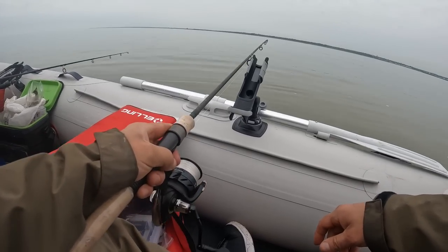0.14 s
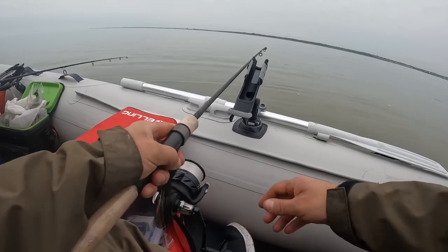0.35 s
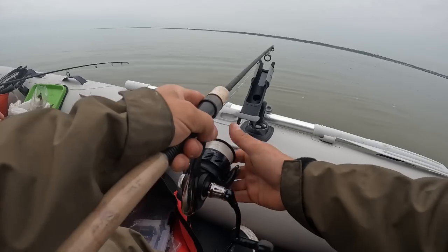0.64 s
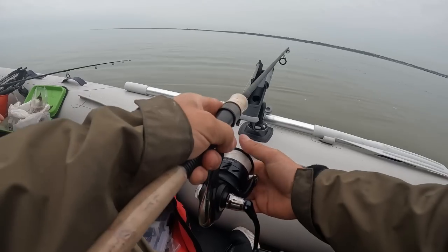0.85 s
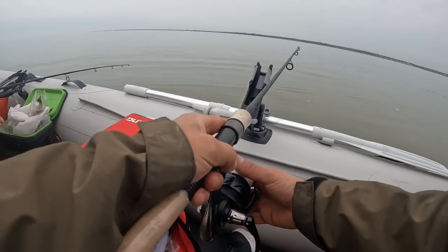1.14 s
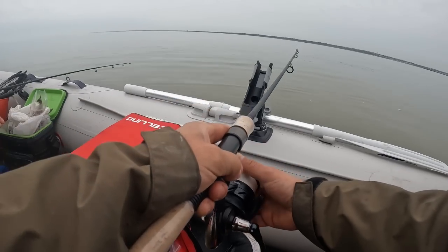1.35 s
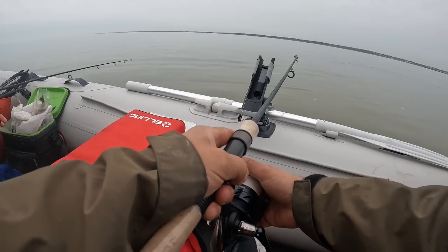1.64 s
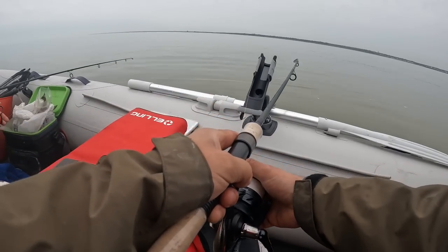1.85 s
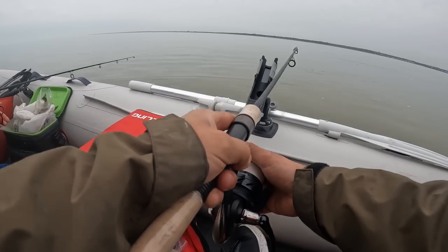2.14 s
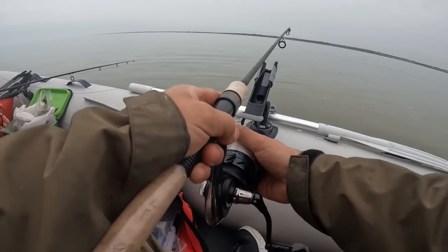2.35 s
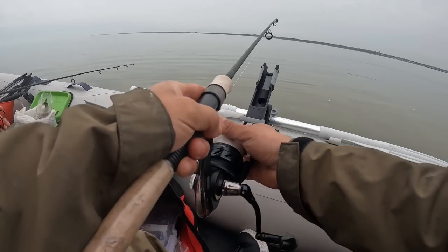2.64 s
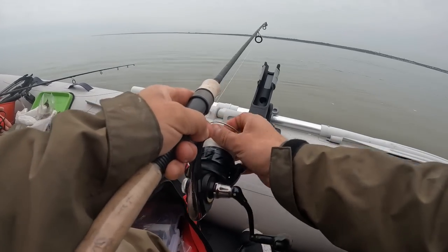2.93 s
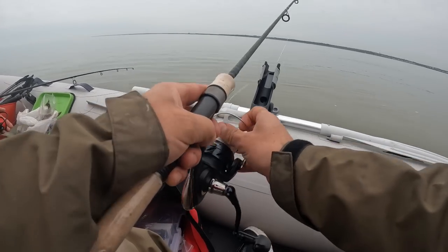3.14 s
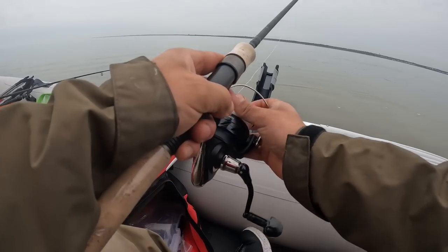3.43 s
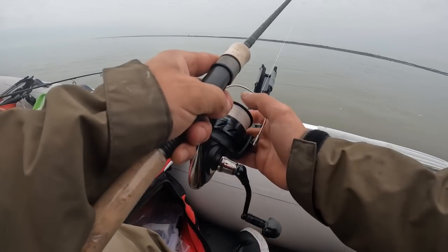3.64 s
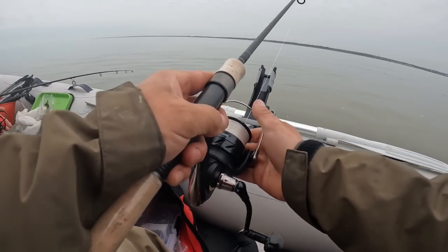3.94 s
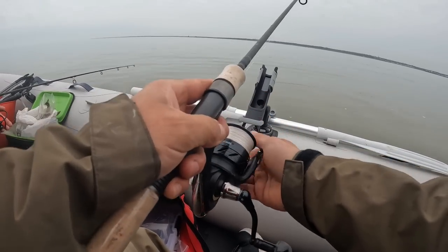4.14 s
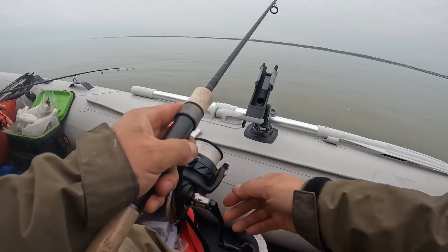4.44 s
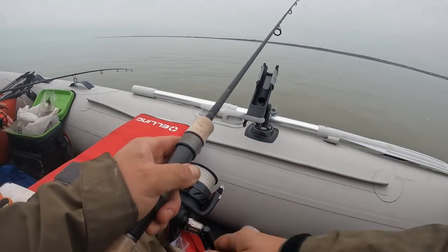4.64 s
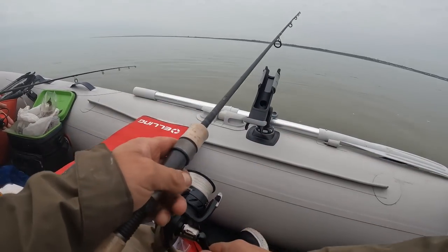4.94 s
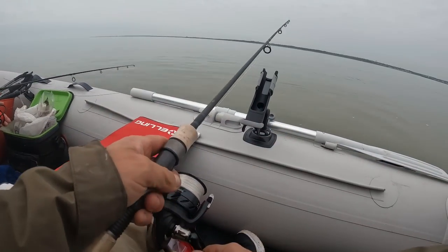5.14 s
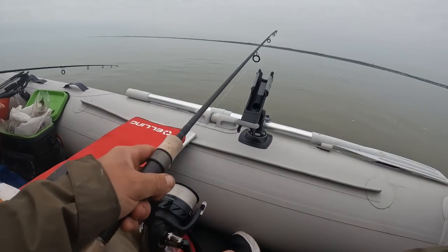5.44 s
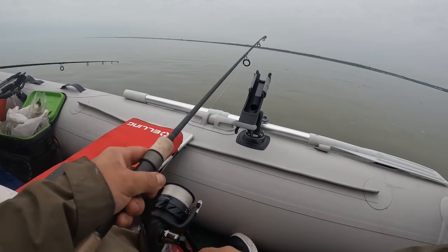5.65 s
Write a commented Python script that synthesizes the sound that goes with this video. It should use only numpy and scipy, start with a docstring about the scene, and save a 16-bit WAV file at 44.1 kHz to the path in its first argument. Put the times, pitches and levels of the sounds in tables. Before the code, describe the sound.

In the open air on an inflatable boat, wavelets thump hollowly on the hull over a steady low rumble. Within arm's reach of the microphone, a sleeve swishes, then a spinning reel gives sharp, briefly ringing knocks on its rod. A quick run of dry line ticks leads to a single bright snap of the bail arm. Sleeves rub again as a louder wavelet booms against the boat.

```python
"""Sharp knocks, dry ticks and a metallic snap sound up close, among swishing sleeves and hollow thumps.
An angler handles a rod and spinning reel in a small inflatable boat, near a body-worn camera.
The reel knocks and rings the rod, line ticks off the spool, and the bail arm chatters on its stop.
Jacket cloth rubs, wavelets set the hull booming, and a low rumble lies over the water."""
import sys
import numpy as np
from scipy.fft import rfft, irfft, next_fast_len
from scipy.io import wavfile
from scipy.ndimage import map_coordinates

SR = 44100
rng = np.random.default_rng(int(sys.argv[2]) if len(sys.argv) > 2 else 0)


def store_wav(level_fs):
    """Save 16-bit WAV to argv[1]."""
    pcm = np.round(np.clip(np.atleast_2d(level_fs), -1, 1) * 32767)
    wavfile.write(sys.argv[1], SR, pcm.T.astype(np.int16))


N = 256017
T = np.arange(SR // 2) / SR  # seconds within one hit

# The loose reel knocks on the rod. Each row: start in seconds, level in dB, thud offset in dB.
KNOCKS = [(1.556, -44.5, 9), (1.581, -41, 1.5), (1.685, -30.5, 1.5), (1.786, -46, 15), (1.942, -24.5, -1.5),
          (1.963, -46, -11), (2.394, -18, -3.5), (2.399, -30, 5), (2.43, -29.5, 1), (2.451, -20.5, -3),
          (2.4575, -15, -.5), (2.924, -17.5, -4), (3.066, -20, 0), (3.094, -23, -0.5), (3.106, -30.5, 2),
          (3.158, -26.5, 4)]
# Tone of sliding cloth. Each row: frequency in Hz, gain in dB.
SWISH_COLOUR = [(300, 2), (800, -11.5), (1400, 2), (2600, -3), (3600, 0.5), (5200, -1), (7200, -1),
                (8300, -8.5), (10500, -10.5), (12500, -15), (14500, -25.5), (16000, -48)]
# Dull tone of the hand on the grip. Each row: frequency in Hz, gain in dB.
PALM_COLOUR = [(40, -30), (160, 0), (330, 3.5), (520, -0.5), (800, -6.5), (1100, -5.5), (2200, -27),
               (5000, -42), (12000, -60)]
# Contour of the hiss and the sleeves' small stirrings. Each row: time in seconds, level in dB.
HISS_LEVEL = [(0, -57), (.2, -59.5), (1.3, -59.5), (2.04, -66), (2.22, -58), (3.6, -57.5), (3.85, -60),
              (4.2, -53), (4.33, -61.5), (5.8, -56)]
# How alike left and right sound. Each row: frequency in Hz, correlation from 0 to 1.
STEREO_LIKENESS = [(100, 1), (300, 0.97), (600, 0.64), (1200, 0.87), (2600, 0.55), (4500, 0.8),
                   (8000, 0.81), (12000, 0.41)]


def reel_knocks():
    """Each knock cracks, rings the rod and thuds in grip and palm; the shifting hand detunes the modes."""
    # Modes of the rod and of its grip. Each row: frequency in Hz, level in dB, t60 in seconds.
    rod_modes = [(902, -23.5, 0.16), (1134.4, -1, 0.1), (1218, -7, 0.078), (1343, -9, 0.054),
                 (1580, -17, 0.057), (1840, -14, 0.08), (2100, -8, 0.019), (2800, -2.5, 0.04),
                 (2980, 5, 0.012), (3460, -10, 0.033), (4090, -14, 0.033), (4490, -8.5, 0.031),
                 (4960, -13, 0.019)]
    grip_modes = [(62.6, -7, 0.21), (104, -4, 0.081), (171, -0.5, 0.064), (217.5, 3.5, 0.073),
                  (285, -2.5, 0.084), (415.6, -9.5, 0.12), (520, -6.5, 0.065)]
    # Tone of the contact crack. Each row: frequency in Hz, gain in dB.
    crack_colour = [(200, 10), (800, -1), (1300, 10), (3200, 5), (5800, -1.5), (7500, -8), (11000, -15),
                    (15500, -36)]
    hard_knock_db = -16.5
    out = np.zeros((2, N))
    for start, db, thud_db in KNOCKS:
        force_db = db - hard_knock_db
        brightness_db = .075 * force_db - .5  # light knocks are duller
        rod = ring(rod_modes, rise=.0004, scatter_db=1.5, tilt_db=brightness_db, detune=.005)
        crack = burst(crack_colour, t60=.061)
        grip = ring(grip_modes, rise=.0053, scatter_db=1.5, detune=.016)
        palm = burst(PALM_COLOUR, t60=.063)
        add(out, start, amp(db - .5) * rod + amp(-25 + .47 * force_db) * crack)
        add(out, start, amp(db + thud_db) * (amp(3) * grip + amp(-6.5) * palm))
    return out


def bail_snap():
    """The sprung wire chatters on its stop, to the right; the rod sings on after it."""
    # The bail arm strikes and bounces. Each row: start in seconds, level in dB.
    strikes = [(4.1985, -14.5), (4.2023, -19.5), (4.2057, -17.5), (4.2115, -18.5)]
    # Modes of the steel wire. Each row: frequency in Hz, level in dB, t60 in seconds.
    wire_modes = [(1330, -19, .045), (1740, -5, .035), (2230, 3.5, 0.023), (2460, -3.5, 0.021),
                  (3340, -15, 0.02), (3730, 7.5, 0.024), (4180, 2, 0.033), (5510, 0, .02), (6100, 2, .02),
                  (7040, 5, .02), (10200, -30, 0.047)]
    # Tone of the snap. Each row: frequency in Hz, gain in dB.
    snap_colour = [(300, -2), (800, -12), (1300, 0), (2200, 7), (7300, -5), (8300, -12), (11000, -6),
                   (14000, -24), (15700, -34)]
    finger_slide = swell(strikes[0][0] - .0065, half_length=.023)  # fingers scrape the wire first
    out = amp(-47) * finger_slide * noise(SWISH_COLOUR)
    for start, db in strikes:
        wire = ring(wire_modes, rise=.0001, scatter_db=2, detune=.015) * amp([[-2.3], [2.3]])
        crack = burst(snap_colour, t60=.016) * amp([[-.8], [.8]])
        add(out, start, amp(db - 3.5) * wire + amp(db - 2.5) * crack)
    add(out, 4.213, amp(-32.5) * burst(snap_colour, t60=.18))  # bright tail
    rod_song = ring([(1145, -1, .2), (1325, 7, .083), (10100, -23, .5)], rise=.0025, scatter_db=-1)
    late_song = ring([(1140, -1, .092), (1263, -11, .076)], rise=.014, scatter_db=3)
    add(out, 4.202, amp(-29.5) * rod_song)
    add(out, 4.232, amp(-25.5) * late_song)
    return out


def line_ticks():
    """Line slips off the spool's lip in dry ticks."""
    # Line and fingernails on the spool. Each row: start in seconds, level in dB, centre in Hz.
    ticks = [(1.2363, -37, 1800), (2.192, -35, 3570), (3.08, -17.5, 3680), (3.128, -23, 2400),
             (3.193, -21.5, 3500), (3.218, -23.5, 3800), (3.238, -29, 1800), (3.251, -21, 3000),
             (3.274, -22.5, 3800), (3.3226, -23.5, 2580), (3.3563, -29.5, 5510), (3.406, -31.5, 4500),
             (3.454, -33, 2500), (3.644, -30, 1670), (5.473, -28.5, 1460)]
    out = np.zeros((2, N))
    for start, db, hz in ticks:
        colour = [(hz / 5, -18), (hz * .65, -1), (hz, 0), (hz * 1.78, -6), (12000, -23), (15500, -42)]
        add(out, start, amp(db - 5) * burst(colour, t60=.021))
    return out


def hand_taps():
    """The hand lands on the grip in short, dull taps."""
    # Taps on the grip. Each row: start in seconds, level in dB.
    taps = [(1.236, -38), (1.509, -36), (2.164, -41), (3.158, -30), (3.645, -36.5), (4.450, -27.5),
            (4.895, -29.5), (5.476, -39)]
    out = np.zeros((2, N))
    for start, db in taps:
        add(out, start, amp(db - 3) * burst(PALM_COLOUR, t60=.046))
    return out


def jacket():
    """Sleeves swish; pressed cloth adds a hollow rub and a low drag."""
    # Tone of dragging cloth. Each row: frequency in Hz, gain in dB.
    drag_colour = [(30, 2), (100, -4.5), (250, -10.5), (450, -1.5), (750, -4), (1100, -5), (2000, -41)]
    # Pan of the moving sleeve. Each row: time in seconds, left minus right in dB.
    sleeve_pan = [(.45, -1.5), (.6, -1), (.76, 4.5), (.95, 4.5), (3.2, 2), (5.2, -0.5), (5.55, 2.5)]
    swish_gain, rub_gain, drag_gain = arm_movements()
    swish = amp(.97) * swish_gain * friction(SWISH_COLOUR, slips_per_s=700, grain=.45, flutter_db=1.34)
    rub = rub_gain * amp(1.3 * wobble(70)) * hollow_folds()
    drag = amp(-2) * drag_gain * friction(drag_colour, slips_per_s=350, grain=.28, flutter_db=2.5)
    return (swish + rub) * amp(curve(sleeve_pan) * [[.5], [-.5]]) + drag


def arm_movements():
    """Envelopes of the cloth's swish, rub and drag; overlapping movements add in power."""
    # A cuff brushes past. Each row: fastest moment in seconds, swish in dB, half length in seconds.
    brushes = [(0.35, -53.5, 0.1), (0.792, -39, 0.054), (0.909, -48.5, 0.018), (1.026, -49, 0.054),
               (1.191, -50, 0.034), (1.386, -54.5, 0.013), (1.456, -54, 0.017), (1.548, -53.5, 0.03),
               (1.645, -57, 0.026), (1.864, -53.5, 0.027), (2.111, -56, 0.02), (2.321, -54, 0.053),
               (2.496, -48, 0.076), (2.693, -53, 0.05), (3.022, -50.5, 0.063), (3.101, -40.5, 0.027),
               (3.21, -41.5, 0.041), (3.289, -41.5, .027), (3.359, -47, 0.021), (3.431, -47.5, 0.028),
               (3.496, -45.5, 0.031), (3.563, -46, 0.02), (4.421, -51, 0.032), (5.353, -53.5, 0.091)]
    # An arm sweeps over the jacket. Each row: start, attack, hold and release (to -20 dB) in seconds,
    # then swish, rub and drag in dB.
    sweeps = [(0.358, 0.073, 0.12, 0.2861, -36.5, -37.5, -44), (3.05, 0.076, 0.12, 0.26, -51.5, -55, -52.5),
              (4.381, 0.29, 0.079, 0.5047, -42.5, -39, -49.5), (4.899, .13, 0.036, 0.14, -42.5, -40.5, -55),
              (5.098, 0.077, 0.062, 0.09, -49, -44.5, -56), (5.395, 0.11, 0.072, .2, -45.5, -55.5, -63),
              (5.548, 0.23, .1, .2, -46, -52.5, -50.5)]
    cuff_rub_db, cuff_drag_db = -10.5, -18.5
    fidget = amp(curve(HISS_LEVEL) - 4 + wobble(9))
    cuff_power = fidget ** 2 + sum((amp(db) * swell(s, half)) ** 2 for s, db, half in brushes)
    power = np.outer(amp([0, cuff_rub_db, cuff_drag_db]) ** 2, cuff_power)
    for start, attack, hold, release, *levels_db in sweeps:
        power += np.outer(amp(levels_db), sweep(start, attack, hold, release)) ** 2
    return np.sqrt(power)


def friction(colour, slips_per_s, grain, flutter_db):
    """Threads catch and slip: tiny clicks on a hiss, under uneven pressure."""
    slips = unit(rng.standard_normal(N) * (rng.random(N) < slips_per_s / SR))
    fibres = rng.standard_normal((2, N)) + grain * slips * [[1], [0]]  # clicks sit in the centre
    return coloured(fibres, colour) * amp(flutter_db * unit(wobble(45) + wobble(170)))


def hollow_folds():
    """The cloth's hollow ring: narrow bands of noise that rise as the folds close."""
    # Pitch of the folds. Each row: time in seconds, centre in Hz.
    fold_pitch = [(.4, 1294), (.8, 1383), (3.2, 1459), (4.55, 1704), (4.8, 1742), (5.05, 1567), (5.8, 1543)]
    # Modes of the folds. Each row: ratio to the centre, half width in Hz, level in dB.
    fold_modes = [(.8, 266, -6), (1, 387, 3.5), (1.42, 430, 1.5)]
    phase = 2 * np.pi * np.cumsum(curve(fold_pitch)) / SR
    bands = np.zeros((2, N))
    for ratio, width_hz, db in fold_modes:
        a, b = filtered(rng.standard_normal((2, 2, N)), lambda hz: 1 / (1 + (hz / width_hz) ** 2))
        bands += amp(db) * unit(a * np.cos(ratio * phase) + b * np.sin(ratio * phase))
    return coloured(bands, [(600, -14), (1000, 4.5), (2550, .5), (2900, -1)])


def hull_slaps():
    """Water slaps set the air tubes and the floor booming, with a dull slosh on top."""
    # Wavelets. Each row: start in seconds, level in dB, rise in seconds, tilt in dB per octave.
    slaps = [(.277, -20.5, 0.018, 2), (.785, -31.5, 0.017, 3), (.826, -27, 0.02, -7.5),
             (1.275, -31, 0.012, -4), (2.251, -31, 0.0032, -6.5), (3.375, -29.5, 0.0036, -5),
             (3.419, -26.5, 0.012, -4.5), (4.054, -29, 0.011, 0.5), (4.18, -30, 0.025, 4),
             (4.843, -33.5, .011, 10), (4.8949, -11.5, 0.0085, 2.5), (4.961, -22, 0.0069, -2.5)]
    # Modes of the hull. Each row: frequency in Hz, level in dB, t60 in seconds.
    hull_modes = [(99.1, 3, 0.3), (130, -1, 0.23), (148.6, 5, 0.19), (215.2, 0.5, 0.16),
                  (264.4, -2.5, 0.18), (363, -17, 0.083)]
    slosh_colour = [(150, -18), (280, 8), (400, 2.5), (700, -4.5), (1400, -6), (4000, -52)]
    out = np.zeros((2, N))
    for start, db, rise, tilt_db in slaps:
        boom = ring(hull_modes, rise, scatter_db=.8, tilt_db=tilt_db)
        slosh = burst(slosh_colour, t60=.2)
        add(out, start, amp(db + 10) * (boom + amp(-21.5) * slosh))
    return out


def camera_jolts():
    """Knocks jolt the camera, and it sways on its harness after a tug."""
    # The camera on its mount. Each row: frequency in Hz, level in dB, t60 in seconds.
    mount_mode = [(33, 0, 0.36)]
    out = np.zeros((2, N))
    for start, db, thud_db in KNOCKS:
        add(out, start, amp(db + thud_db - 4) * ring(mount_mode, rise=.0068, scatter_db=0))
    sway = ring([(27.3, 0, .79)], rise=.0063, scatter_db=0)
    add(out, 3.147, amp(-8) * sway)
    return out


def rumble():
    """A low drone swells and sinks over the water."""
    # Contour of the drone. Each row: time in seconds, level in dB.
    rumble_level = [(0.0, -44), (0.65, -40.5), (1.0, -43.5), (1.34, -42.5), (1.87, -46.5), (3.3, -41.5),
                    (3.6, -43.5), (5.81, -44)]
    # Its tone. Each row: frequency in Hz, gain in dB.
    rumble_colour = [(8, -36), (25, -2.5), (36, -5.5), (48, -9), (59, 3), (72, -12), (110, -14.5),
                     (200, -25), (330, -33), (700, -43.5), (2000, -89)]
    return amp(curve(rumble_level) + 3) * noise(rumble_colour)


def hiss():
    """A faint hiss lies under the handling."""
    # Tone of the hiss. Each row: frequency in Hz, gain in dB.
    hiss_colour = [(300, -16), (750, -24), (1000, 6.5), (1450, 9.5), (2400, 2), (3600, 1), (7200, -2),
                   (8300, -7), (11500, -8), (15500, -20)]
    return amp(curve(HISS_LEVEL) - 2.5) * noise(hiss_colour)


def ring(modes, rise, scatter_db, tilt_db=0, detune=0):
    """Damped modes, struck at scattered strengths; high ones reach left and right out of step."""
    hz, db, t60 = np.transpose(modes)[:, :, None]
    strength = amp(db + scatter_db * rng.standard_normal(hz.shape) + tilt_db * np.log2(hz / hz[0]))
    hz = hz * (1 + detune * rng.standard_normal(hz.shape))
    skew = rng.choice([-1, 1], hz.shape) * stereo_angle(hz)
    polarity = (-1) ** np.arange(len(hz))[:, None]
    waves = polarity * strength * amp(-60 * T / t60) * np.sin(2 * np.pi * hz * T + np.array([skew, -skew]))
    return unit_hit(waves.sum(axis=1) * (1 - np.exp(-T / rise)))


def burst(colour, t60):
    """The dying noise of one contact, which takes an instant to close."""
    closing = 1 - np.exp(-(T / .0005) ** 2)
    return unit_hit(noise(colour, len(T)) * closing * amp(-60 * T / t60))


def swell(peak_s, half_length):
    """A quick movement, fastest at peak_s."""
    return np.exp(-((np.arange(N) / SR - peak_s) / half_length) ** 2)


def sweep(start, attack, hold, release):
    """A long movement speeds up smoothly, holds, slows gently and then stops."""
    t = np.arange(N) / SR - start
    slowing = np.maximum(t - attack - hold, 0) / release
    return np.sin(np.pi / 2 * np.clip(t / attack, 0, 1)) ** 2 * amp(-20 * slowing ** 1.19)


def noise(colour, length=N):
    """Steady stereo noise of a given tone."""
    return coloured(rng.standard_normal((2, length)), colour)


def coloured(pair, colour):
    """Shape two unrelated signals into a left and right of rms 1, alike in the bass."""
    def response(hz):
        angle = stereo_angle(hz)
        return amp(along(colour, hz)) * [np.cos(angle), np.sin(angle)]
    mid, side = filtered(pair, response)
    return unit(np.array([mid + side, mid - side]))


def stereo_angle(hz):
    """Stereo spread in radians; 0 is mono."""
    return np.arccos(np.clip(along(STEREO_LIKENESS, hz), -1, 1)) / 2


def filtered(x, response):
    """Apply a frequency response."""
    n = x.shape[-1]
    padded = next_fast_len(n + 8192)
    return irfft(rfft(x, padded) * response(np.fft.rfftfreq(padded, 1 / SR)), padded)[..., :n]


def wobble(rate):
    """A smooth random curve, rate knots a second."""
    return map_coordinates(rng.standard_normal(int(N * rate / SR) + 4), [np.arange(N) * rate / SR])


def along(points, hz):
    """Read (Hz, value) points on a log axis."""
    knots_hz, values = np.transpose(points)
    return np.interp(np.log(hz + 1), np.log(knots_hz + 1), values)


def curve(rows):
    """Turn (seconds, value) rows into one value per sample."""
    return np.interp(np.arange(N) / SR, *np.transpose(rows))


def amp(db):
    """Decibels to gain."""
    return 10 ** (np.asarray(db) / 20)


def unit(x):
    """Scale to rms 1."""
    return x / np.sqrt(np.mean(x ** 2) + 1e-20)


def unit_hit(x):
    """Give a stereo hit the energy of one millisecond at rms 1."""
    return x / np.sqrt(np.sum(np.mean(x ** 2, axis=0)) / (SR * .001))


def add(track, start, sound):
    """Mix a hit in at start seconds."""
    part = track[:, round(start * SR):][:, :len(T)]
    part += sound[..., :part.shape[1]]


def scene():
    """Everything is within arm's reach, in open air, leaning a touch to the left."""
    cloth_and_hiss = jacket() + hiss()
    tackle = reel_knocks() + hand_taps() + line_ticks() + bail_snap()
    low_end = hull_slaps() + rumble() + camera_jolts()
    return (cloth_and_hiss + tackle + low_end) * amp([[.2], [-.2]])


def record(dry):
    """Sound reaches the left microphone port a little late, and the very top is cut off."""
    # Lag of the left port. Each row: frequency in Hz, phase lag in radians.
    port_lag = [(100, 0.18), (600, 0.47), (1300, 0.45), (2700, 0.84), (5000, 0.36), (10000, 0)]
    top_hz = 15750
    return filtered(dry, lambda hz: np.exp(.5j * along(port_lag, hz) * [[-1], [1]]) * (hz < top_hz))


dry = scene()
out = record(dry)
store_wav(out)
```